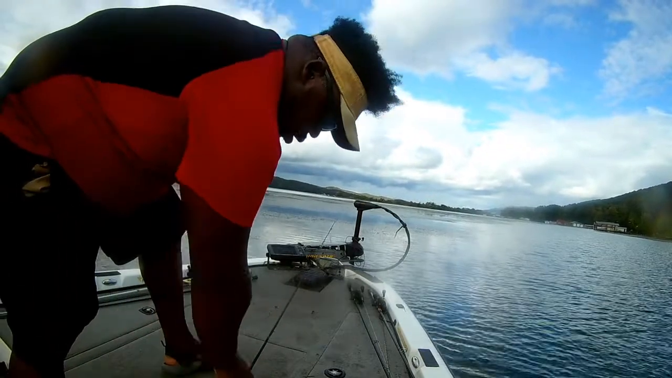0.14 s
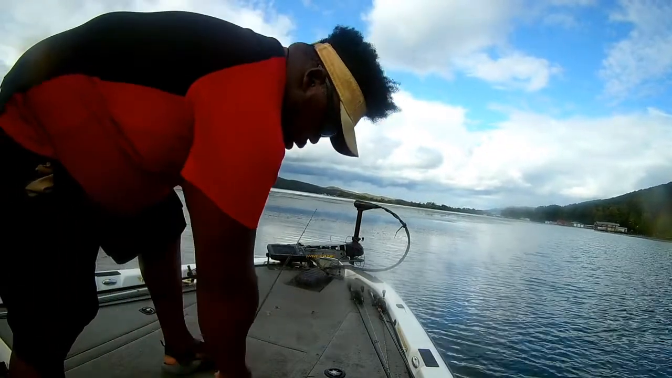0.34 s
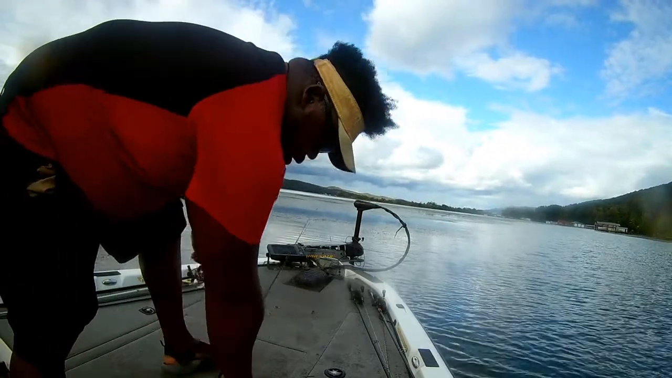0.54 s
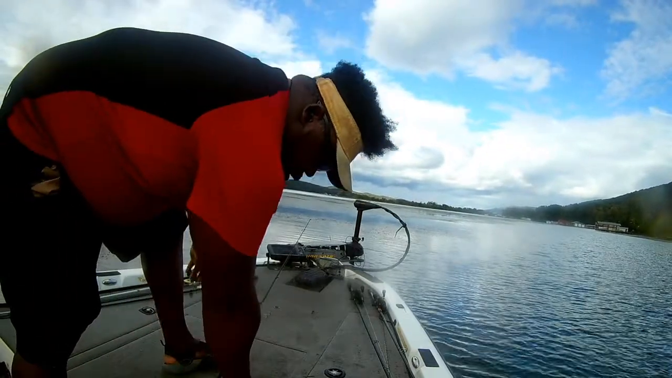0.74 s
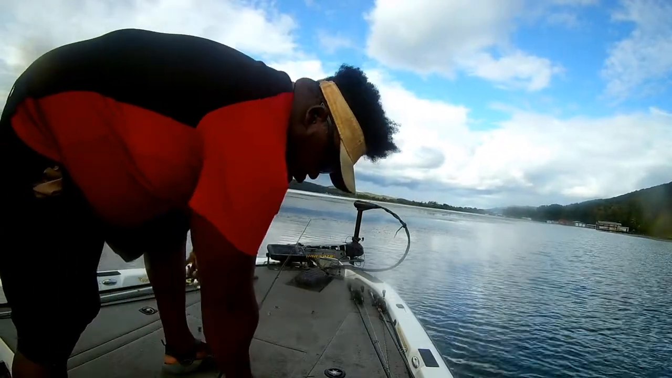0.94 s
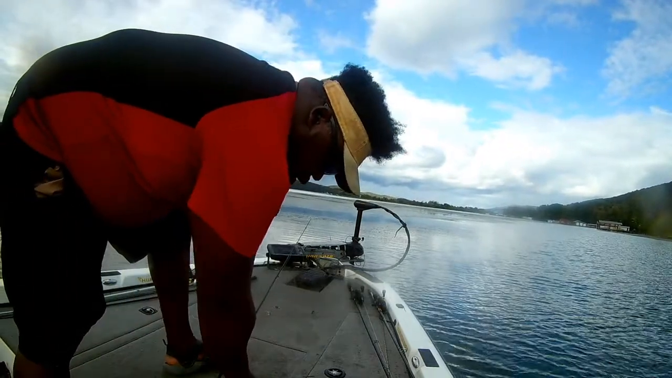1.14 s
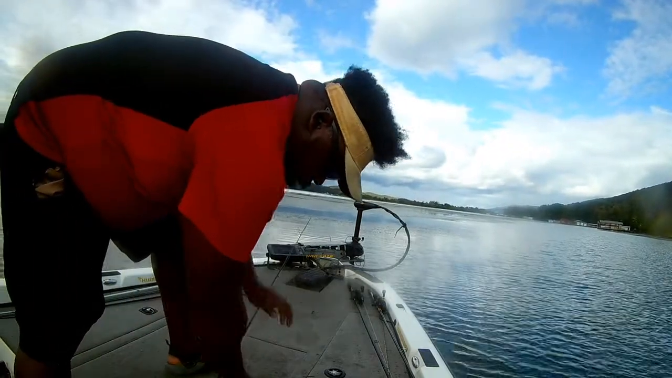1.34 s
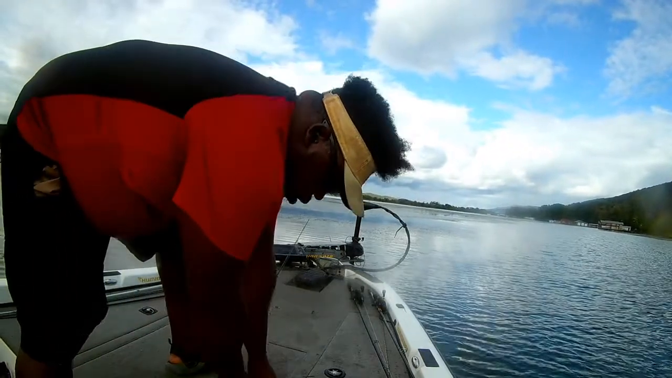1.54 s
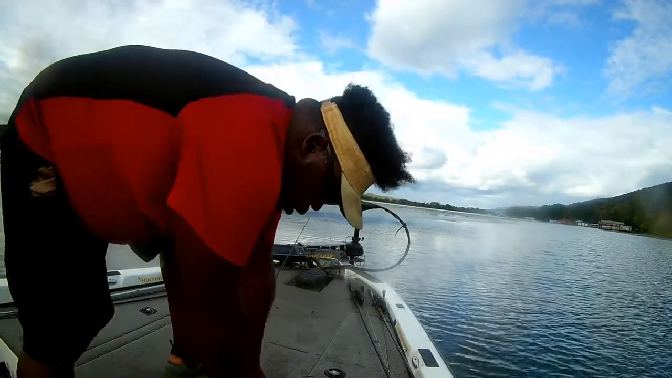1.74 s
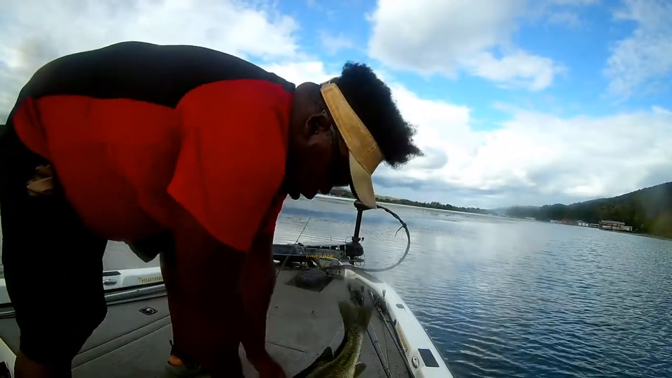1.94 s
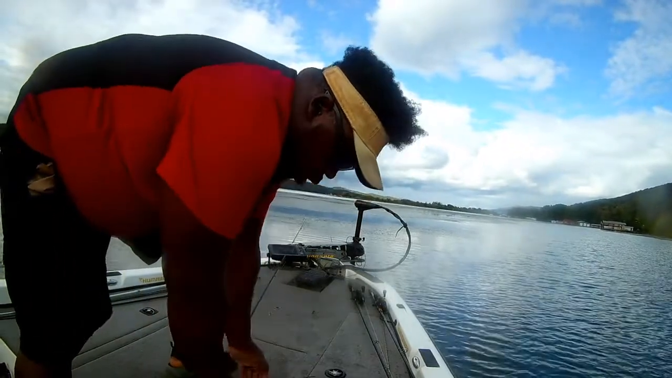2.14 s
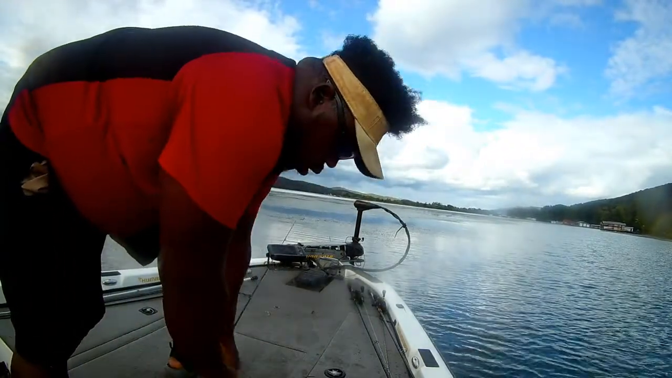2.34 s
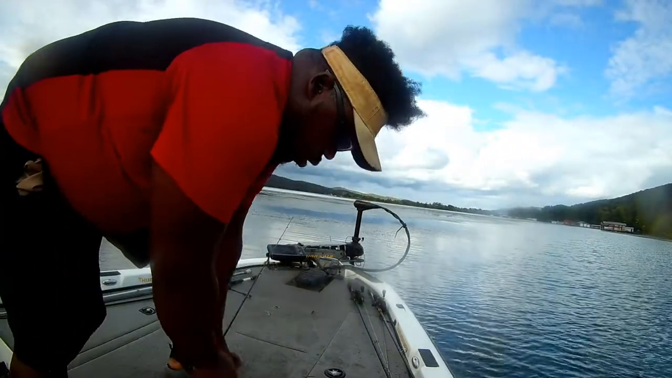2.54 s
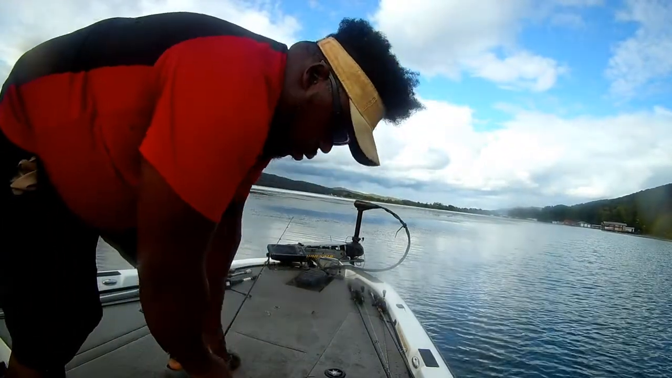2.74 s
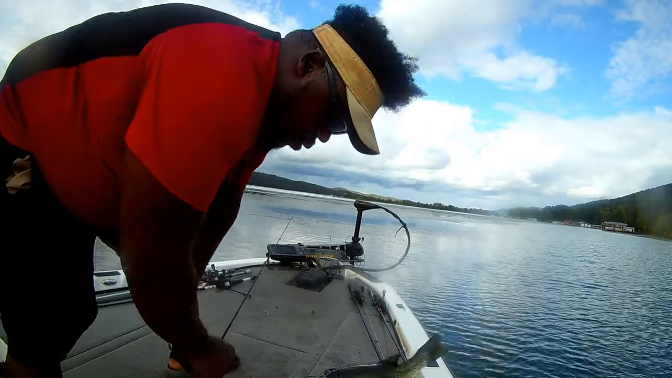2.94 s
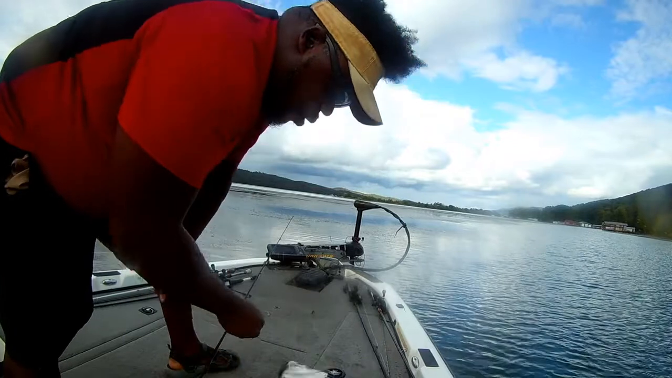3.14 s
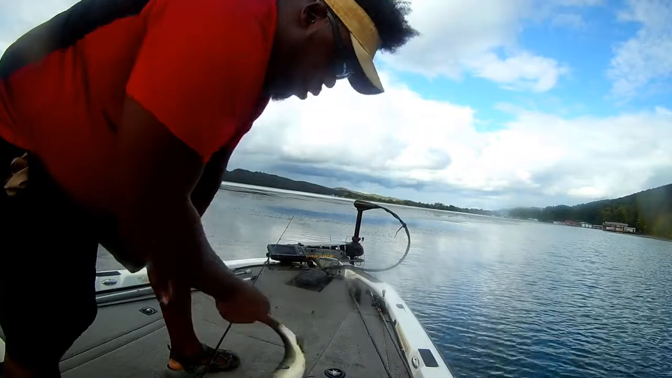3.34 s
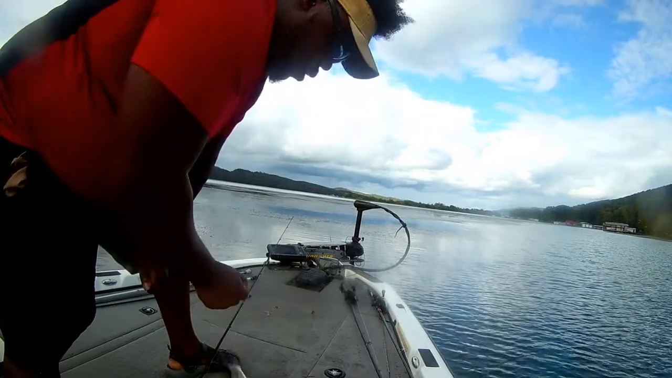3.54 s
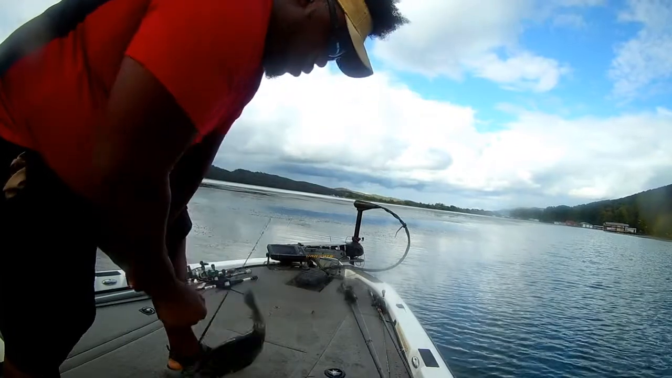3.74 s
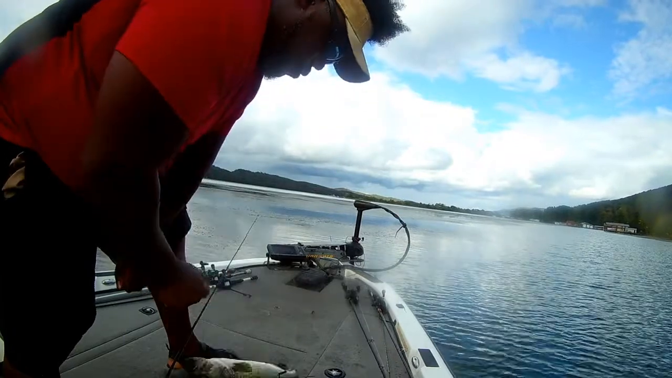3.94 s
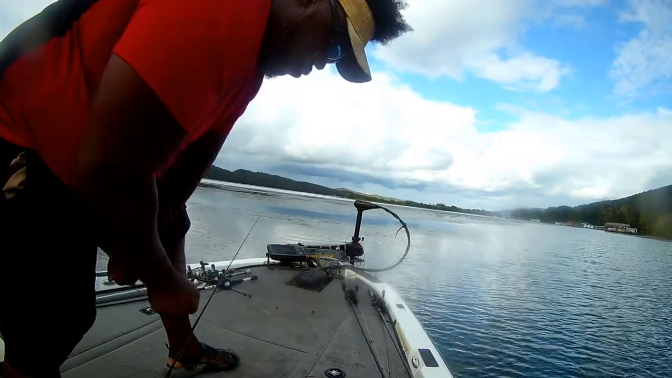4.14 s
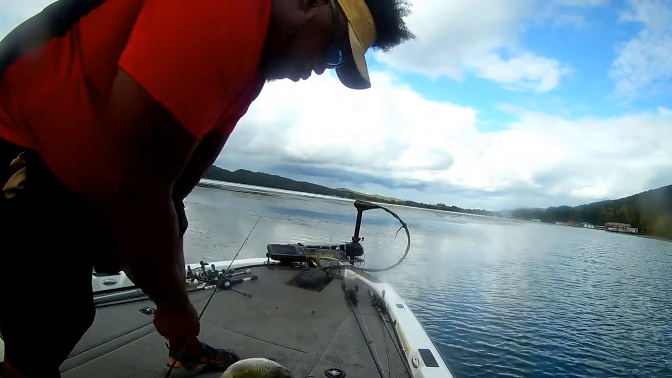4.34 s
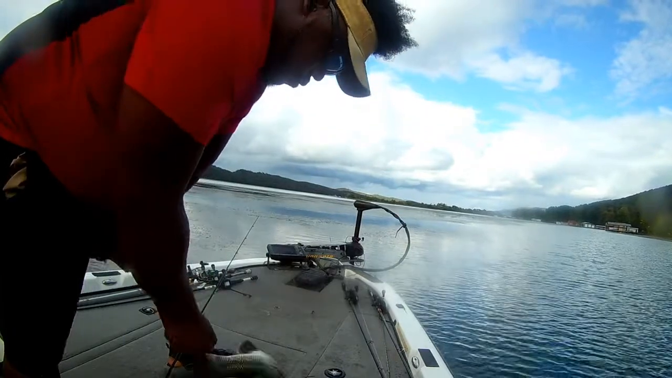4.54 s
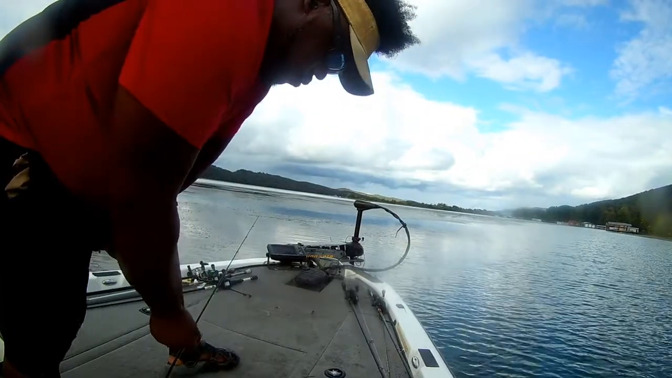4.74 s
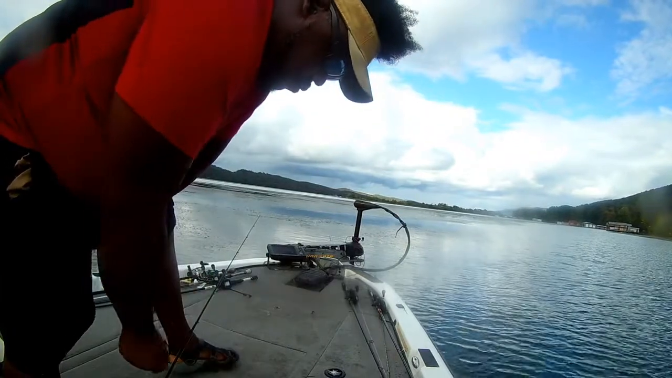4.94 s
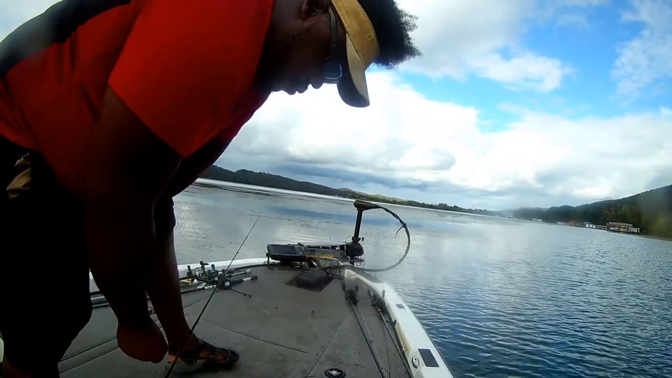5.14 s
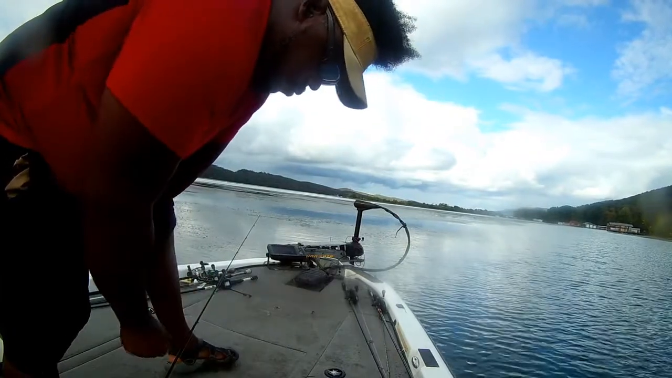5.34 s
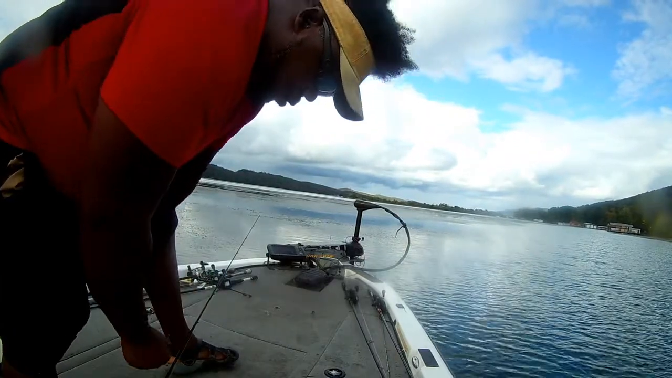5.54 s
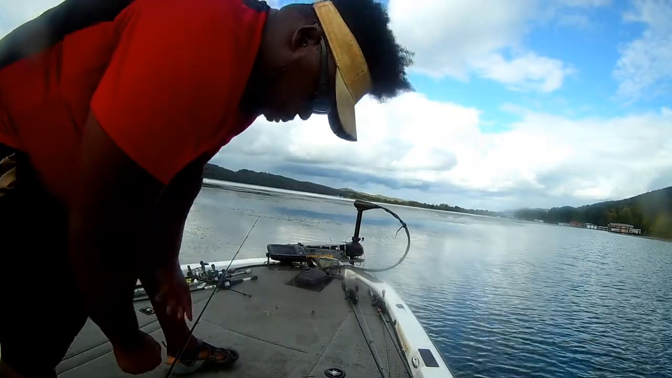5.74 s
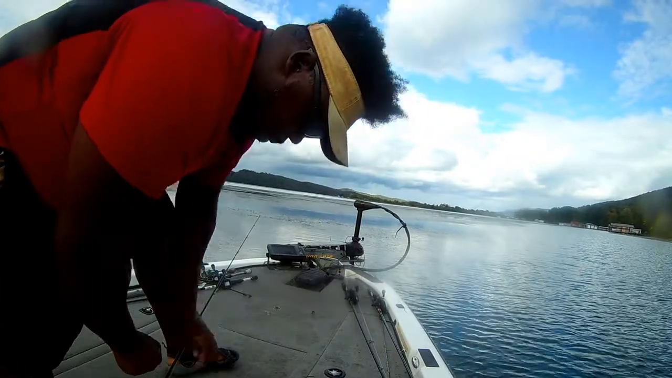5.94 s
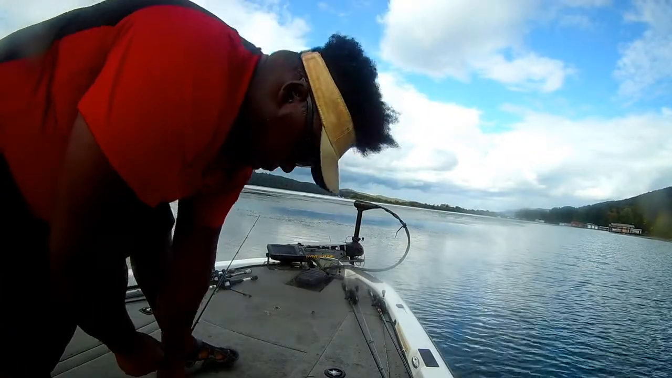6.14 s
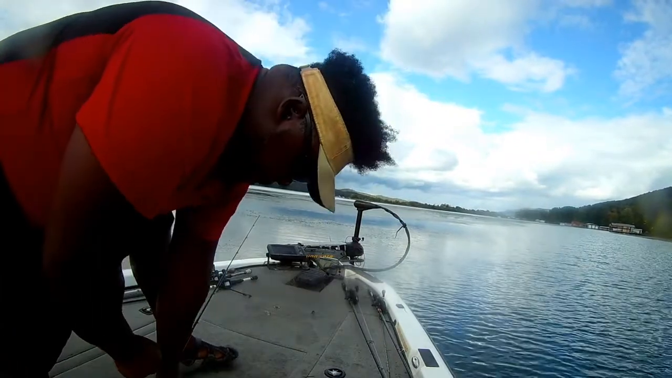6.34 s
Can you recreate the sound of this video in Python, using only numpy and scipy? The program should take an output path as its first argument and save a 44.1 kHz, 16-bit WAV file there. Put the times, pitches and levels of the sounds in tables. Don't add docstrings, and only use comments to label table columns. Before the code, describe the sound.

Close, hull-mounted pickup of a fish flopping on a boat deck. A dull, unsteady rumble and gentle knocks come first, then a light double thump, then sudden rapid slaps with deep hollow booms and brief dry rattles of loose gear. Bursts recur irregularly for about three seconds, the loudest crunching with overload. The fish then goes still, leaving low rumble, faint airy hiss and soft bumps outdoors.

```python
import sys
import numpy as np
from scipy import signal
from scipy.fft import rfft, irfft
from scipy.io import wavfile
from scipy.ndimage import uniform_filter1d

SR = 44100
rng = np.random.default_rng(int(sys.argv[2]) if len(sys.argv) > 2 else 0)


def bounce(signal):
    frames = np.transpose(np.atleast_2d(signal))
    limited = np.clip(frames, -1, 1)
    pcm = np.round(limited * 32767).astype(np.int16)
    wavfile.write(sys.argv[1], SR, pcm)


def voltage_ratio(level):
    return 10 ** (np.asarray(level, float) / 20)


N = 282681

# pitch in Hz, level in dB, time to die by 60 dB in seconds.
LIDS = [(690, -6, .025), (830, -6, .022), (990, -1, .028), (1150, -3, .022), (1400, -12, .018),
        (1580, -11, .02), (1800, -7, .025), (2050, -10, .018), (2250, -13, .018)]


def evened(x):
    return x / np.sqrt(np.mean(x ** 2) + 1e-20)


def peaked(x):
    return x / abs(x).max()


def below(x, hz, order):
    return signal.sosfilt(signal.butter(order, hz, fs=SR, output="sos"), x)


def read(points, hz):
    point_hz, value = np.transpose(points)
    return np.interp(np.log(hz + 1), np.log(point_hz + 1), value)


def add(mix, start, sound):
    part = mix[max(round(start * SR), 0):][:len(sound)]
    part += sound[:len(part)]


def ring(modes, seconds, spread_db=0):
    hz, db, t60 = np.transpose(modes)[:, :, None]
    t = np.arange(round(seconds * SR)) / SR
    fading = voltage_ratio(db + spread_db - 60 * t / np.maximum(t60, .004))
    return (fading * np.sin(2 * np.pi * hz * t)).sum(0)


def noise(points, size, patchy_db):
    hop = size // 4
    frames = N // hop + 5
    hz = np.fft.rfftfreq(size, 1 / SR)
    a, b, patches = rng.standard_normal((frames, len(hz), 3)).T
    for axis in (0, 1):
        patches = uniform_filter1d(patches, size=5, axis=axis)
    level_db = read(points, hz)[:, None] + patchy_db * evened(patches)
    spectra = (a + 1j * b) * voltage_ratio(level_db)
    return evened(signal.istft(spectra, nperseg=size, noverlap=size - hop)[1][:N])


def air():
    # pitch in Hz, level in dB per Hz.
    air_spectrum = [(290, -42), (500, -10.5), (639, -2.5), (840, -8.5), (1010, -6.5), (1110, -9),
                    (1430, -9.5), (2340, -20.5), (3400, -23.5), (7970, -30.5), (15700, -30)]
    return voltage_ratio(-57.5) * noise(air_spectrum + [(15900, -100)], size=512, patchy_db=0.0)


def rumble():
    # pitch in Hz, level in dB per Hz.
    rumble_spectrum = [(12, -37), (20, -9.5), (66, -2.5), (119, -4.5), (159, -8), (213, -5.5), (295, -12.5),
                       (344, -10.5), (381, -21), (460, -20), (837, -45.5), (1200, -45), (1560, -58.5),
                       (2640, -120)]
    # time in seconds, rumble level in dB.
    gusts = [(0.0, -38), (1.23, -38.5), (1.52, -39), (2.07, -37.5), (2.3, -34.5), (2.53, -37),
             (3.43, -34.5), (4.62, -35.5), (4.86, -34.5), (5.57, -37.5), (6.12, -35), (6.41, -37.5)]
    s, db = np.transpose(gusts)
    lumps_db = rng.standard_normal(N)
    for _ in range(2):
        lumps_db = uniform_filter1d(lumps_db, size=2000)
    level_db = np.interp(np.arange(N) / SR, s, db) + evened(lumps_db)
    return voltage_ratio(level_db) * noise(rumble_spectrum, size=2048, patchy_db=1.7)


def squeak():
    # time in seconds, pitch in Hz, level in dB.
    squeak_path = [(2.415, 2285, -68), (2.44, 2280, -64), (2.51, 2250, -63), (2.57, 2255, -64),
                   (2.63, 2260, -65), (2.69, 2270, -63)]
    s, hz, db = np.transpose(squeak_path)
    t = np.arange(s[0], s[-1], 1 / SR)
    r = np.exp(-np.pi * 25 / SR)
    waver = signal.lfilter([1 - r], [1, -r], rng.standard_normal((len(t), 2)) @ [1, 1j])
    turning = waver / abs(waver)
    carrier = np.exp(2j * np.pi * np.cumsum(np.interp(t, s, hz)) / SR)
    tone = ((.7 + evened(abs(waver)) * turning) * carrier).real
    out = np.zeros(N)
    add(out, s[0], voltage_ratio(np.interp(t, s, db)) * evened(tone) * signal.windows.tukey(len(t), .15))
    return out


def rail():
    # start in seconds, pitch in Hz, level in dB, ring time in s (ring() allows 4 ms or more).
    rail_tone = (2.24, 632, -36, -6)
    out = np.zeros(N)
    add(out, rail_tone[0], ring([rail_tone[1:]], .2) * signal.windows.tukey(round(.2 * SR), .2))
    return out


def cracks():
    # start in seconds, peak in dB.
    metal_cracks = [
        (2.1604, -23),
        (3.481, -36),
    ]
    out = np.zeros(N)
    jump = np.diff(np.exp(-np.arange(60) / 4.0), prepend=0)
    for s, db in metal_cracks:
        add(out, s, voltage_ratio(db) * jump)
    return out


def clatter(hz, spot, ring_db=0):
    # pitch in Hz, level in dB, time to die by 60 dB in seconds.
    tackle_modes = [(2800, -7, .008), (3030, 0, .01), (3450, -2, .008), (3850, -3, .007), (4220, -1, .009),
                    (4520, -5, .01)]
    # pitch in Hz, level in dB, time to die by 60 dB in seconds.
    hook_modes = [(4950, 0, .008), (5400, -1, .007), (5850, -2, .007), (6600, -6, .007), (7200, -6, .008)]
    knock = ring([(hz, ring_db, .028)], .05)
    lids = below(knock + ring(LIDS, .05, spot[0]), 2300, order=10)
    tackle = below(ring(tackle_modes, .05, spot[1, :len(tackle_modes)]), 4650, order=12)
    hooks = below(ring(hook_modes, .05, spot[2, :len(hook_modes)]), 7600, order=10)
    return peaked(lids), peaked(tackle), peaked(hooks)


def drag(length, db, tackle_db, hook_db):
    t = np.arange(0, length, 1 / SR)
    hit, size, sign = rng.random((9000, 3, 3))[:len(t)].T
    slip_now = hit[0] < 700 / SR
    slips = slip_now * np.sign(sign - .5) * voltage_ratio(-18 * size[0] - 6.1 * size)
    lids, tackle, hooks = clatter(1500, np.zeros((3, len(LIDS), 1)))
    clicks = (np.diff(lids, 2), tackle, hooks)
    sound = np.zeros(len(t))
    for level_db, train, click in zip((0, tackle_db, hook_db), slips, clicks):
        sound += voltage_ratio(level_db) * evened(signal.fftconvolve(train, click)[:len(t)])
    return voltage_ratio(db) * sound * np.sin(np.pi * t / length)


def writhing():
    # start in seconds, length in seconds, level in dB, tackle in dB, hooks in dB.
    drags = [
        (2.129, 0.06, -32, -5, -35),
        (2.194, 0.037, -40, -16, -31),
        (2.675, 0.021, -31.5, -13.5, -27),
        (2.723, 0.017, -47, -10, -22),
        (3.163, 0.13, -51.5, -21, -13),
        (3.249, 0.088, -47.5, -11, -17),
        (3.645, 0.15, -64, -18, -26),
        (4.004, 0.058, -41, -12, -24),
        (4.745, 0.03, -37.5, -8, -25),
        (4.787, 0.023, -51, -19, -18),
    ]
    out = np.zeros(N)
    for start, *settings in drags:
        add(out, start, drag(*settings))
    return out


def rattles():
    # start in seconds, peak in dB, tackle in dB.
    gear_ticks = [(2.24, -40, -30), (2.259, -29.5, -45), (2.324, -52, -15), (2.771, -35, -19),
                  (3.053, -35, -14.5), (3.129, -39, -22), (3.177, -20.5, -32), (3.187, -26, -28),
                  (3.205, -37, -19), (3.255, -41, -15), (3.314, -42, -16.5), (3.346, -28.5, -31),
                  (3.389, -39, -34), (3.513, -30, -27), (3.533, -33, -15.5), (3.594, -39, -37),
                  (3.611, -45, -17), (3.619, -27, -29), (3.664, -44, -20), (3.712, -40, -23),
                  (4.048, -19.5, -43), (4.075, -26.5, -26), (4.238, -40, -19), (4.273, -24.5, -28),
                  (4.296, -32, -32), (4.81, -35, -24.5), (4.828, -38, -26), (4.847, -33.5, -33),
                  (4.885, -30, -29.5), (6.174, -51, -29)]
    # start in seconds, peak in dB, tackle in dB, knock pitch in Hz.
    hard_knocks = [(1.719, -22, -21, 1820), (2.128, -10, -23.5, 760), (2.138, -0.5, -28, 1026),
                   (2.15, -4.5, -29, 990), (2.159, 9.5, -27, 1120), (2.167, -6.5, -35, 980),
                   (2.174, 3.5, -37, 996), (2.188, -9.5, -24, 775), (2.214, -19.5, -25, 960),
                   (2.228, -10.5, -26.5, 880), (2.354, -32, -30, 960), (2.364, -28.5, -50, 970),
                   (2.684, -7.5, -35, 960), (2.693, -6, -18, 1944), (2.701, -15.5, -37, 1860),
                   (2.719, -22, -15, 1620), (2.725, -9.5, -29, 703), (2.756, -31, -21, 1820),
                   (3.142, -19, -22, 680), (3.148, -13.5, -26.5, 970), (3.219, -21, -11.5, 960),
                   (3.48, -10.5, -29, 650), (3.492, -17.5, -24, 660), (4.006, -16, -19, 1860),
                   (4.014, -16, -32, 800), (4.029, -12, -23.5, 940), (4.752, -10.5, -37, 1690),
                   (4.762, -8.5, -30, 990), (4.787, -14.5, -29.5, 704), (4.797, -16, -21.5, 1200)]
    # its ring is 3.5 dB, that of a tick -5.5 dB at the usual 960 Hz
    rows = [(*row, 3.5) for row in hard_knocks] + [(*row, 960, -5.5) for row in gear_ticks]
    out = np.zeros(N)
    u = np.arange(3000) / SR
    chance = rng.random((len(rows), 3, 3, len(u)))
    spots_db = 2 * rng.standard_normal((len(rows), 3, len(LIDS), 1))
    smack = 0.66 * np.exp(-((u - .0014) / 0.00093) ** 2)
    for (s, db, tackle_db, hz, ring_db), (hit, size, sign), spot in zip(rows, chance, spots_db):
        bounce_db = -6.5 - 0.53 * db - 29.0 * size - 1060 * u
        bounces = voltage_ratio(bounce_db) * (1 - np.exp(-u / 0.001))
        bounce_now = hit < 2500 / SR
        patter = bounce_now * np.sign(sign - .5) * bounces + smack * (size - .5)
        patter[:, 40] = .7
        levels_db = (0, tackle_db + 5, tackle_db - 9.5)
        for level_db, train, click in zip(levels_db, patter, clatter(hz, spot, ring_db)):
            add(out, s - .001, voltage_ratio(db - 6.5 + level_db) * signal.fftconvolve(train, click))
    return out


def blows():
    # pitch in Hz, level in dB, time to die by 60 dB in seconds.
    hull_modes = [(45.4, -17, 0.68), (70, -4.5, 0.11), (102, -8.5, 0.35), (143.1, -3.5, 0.092)]
    # pitch in Hz, level in dB, time to die by 60 dB in seconds.
    hatch_modes = [(193.5, -2.5, 0.085), (232.4, -14.5, 0.15), (291.6, -0.5, 0.077), (321, -7, 0.081),
                   (390, -2, 0.11), (439, -7, 0.059), (487.5, -7, 0.12), (543, 0, 0.076),
                   (598, -18.5, 0.24), (678, -16, 0.043), (801, -2.5, 0.14)]
    # start in seconds, peak in dB, panel pitch in Hz, contact in ms, hatch knock in dB.
    slaps = [(2.124, 4.5, 169, 2.7, -8.5), (2.15, -9, 128, 4.1, 2), (2.163, -2, 151, 2.65, 12),
             (2.234, -12.5, 390, 1.56, -15), (2.26, -21.5, 80.7, 1.3, 4), (2.356, -20.5, 61, 2.5, -11),
             (2.663, -4.5, 91.5, 4.3, -22), (2.682, -1, 91.3, 3.2, -9.5), (2.697, -5, 113, 1.44, -7),
             (2.768, -16.5, 115, 3.7, -2), (3.143, -13.5, 170, 1.62, 2), (3.2, -9.5, 480, 1.84, -8.5),
             (3.239, -26, 90, 1.7, 2), (3.476, 6.5, 205, 2.56, -5.5), (3.4892, 0.5, 200, 3.1, 5.5),
             (3.519, -9, 83.4, 3.6, -7), (3.801, -14.5, 204, 2.3, -16), (3.997, -5.5, 130, 4.5, 3),
             (4.073, -18.5, 134, 4.3, -13), (4.259, -9.5, 137, 3.77, -2.5), (4.748, 1, 150, 2.74, -1),
             (4.759, -1.5, 85.6, 1.93, -8), (4.867, -14.5, 91.5, 4.1, -12)]
    # start in seconds, peak in dB, panel pitch in Hz, contact in ms,
    # hull boom in dB.
    thumps = [(1.678, -20, 107, 2.5, 12), (1.722, -22.5, 80.7, 3.9, -7), (2.134, 4.5, 60.5, 2.9, 5.5),
              (2.188, -5.5, 76, 1.53, 11.5), (2.725, -6.5, 61.9, 1.23, 7), (2.747, -10.5, 113, 1.03, 15),
              (3.122, -10.5, 88, 2.5, 12.5), (3.154, -10, 67.3, 2.25, 10), (3.314, -5.5, 286, 3.4, -5),
              (3.344, -13, 116, 1.7, 20), (3.6, -14, 62.3, 2.6, 7), (4.028, -7, 192, 2.1, 2.5),
              (4.242, -17.5, 226, 0.99, 20.5), (4.281, -11.5, 105, 4.3, 11), (4.791, -6, 80, 2, 5.5)]
    # start in seconds, peak in dB, panel pitch in Hz.
    bumps = [(0.009, -25, 70), (0.329, -22.5, 83), (0.439, -22.5, 123), (0.473, -15.5, 59.7),
             (0.689, -26.5, 71), (0.886, -49, 231), (1.02, -20.5, 66), (1.191, -23, 71), (1.312, -21, 61.5),
             (2.518, -23.5, 102), (2.879, -30, 66), (2.927, -21.5, 91.5), (3.026, -21, 88.5),
             (3.39, -34, 140), (3.707, -36, 88), (4.148, -21, 89), (5.68, -23.5, 88), (5.937, -16.5, 96),
             (5.963, -11.5, 102), (6.119, -18, 75.5), (6.24, -22, 59.6), (6.369, -21.5, 94)]
    rows = [(s, db, hz, ms, -14.5, knock_db) for s, db, hz, ms, knock_db in slaps]
    rows += [(*row, -0.1) for row in thumps]
    rows += [(s, db, hz, 1000 * 0.43 / hz, 1.5, -6.5) for s, db, hz in bumps]

    out = np.zeros(N)
    size = 16384
    hz_axis = np.fft.rfftfreq(size, 1 / SR)
    bending = np.exp(-2j * np.pi * 0.0597 * np.sqrt(hz_axis))
    no_deep_bass = (1j * hz_axis / (1j * hz_axis + 45)) ** 2
    travel = bending * no_deep_bass
    hull, hatch = ring(hull_modes, .3), ring(hatch_modes, .3)
    for s, db, hz, contact_ms, boom_db, knock_db in rows:
        push = np.hanning(max(round(contact_ms * SR / 1000), 8))
        panel = ring([(hz, 0, 8.4 / hz)], .3)
        body = panel + voltage_ratio(boom_db) * hull + voltage_ratio(knock_db) * hatch
        thud = irfft(rfft(body, size) * rfft(push, size) * travel)[:14000]
        add(out, s, -voltage_ratio(db - 2.5) * peaked(thud))
    return out


def scene():
    background = air() + rumble() + squeak()
    loose_gear = rail() + cracks() + writhing() + rattles()
    return (background + loose_gear + blows())[None]


def band_limit(x):
    return signal.sosfilt(signal.butter(12, 16850, fs=SR, output="sos"), x)


def record(dry):
    overloaded = np.clip(dry, -1, 1)
    return band_limit(overloaded)


dry = scene()
out = record(dry)
bounce(out)
```